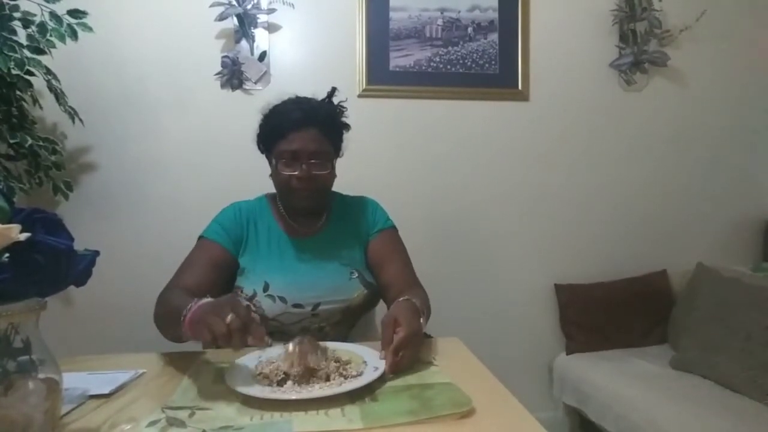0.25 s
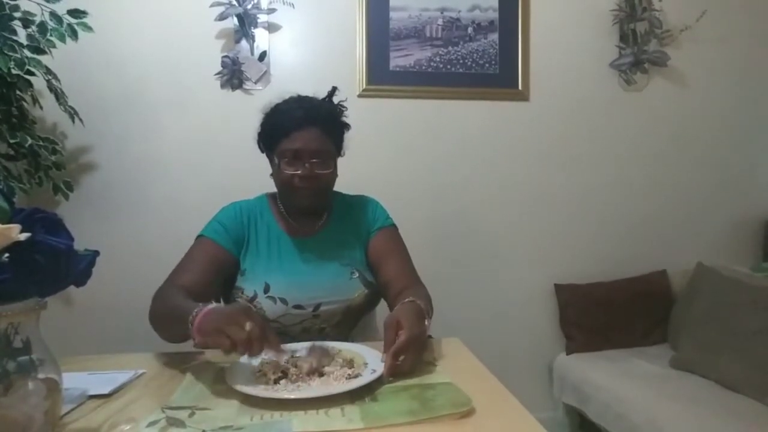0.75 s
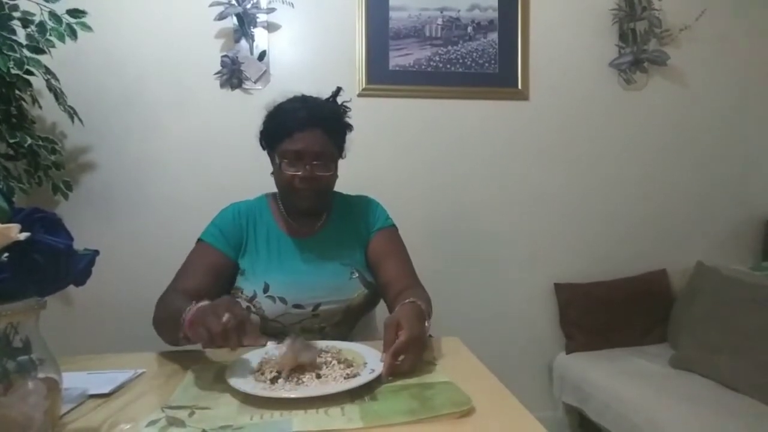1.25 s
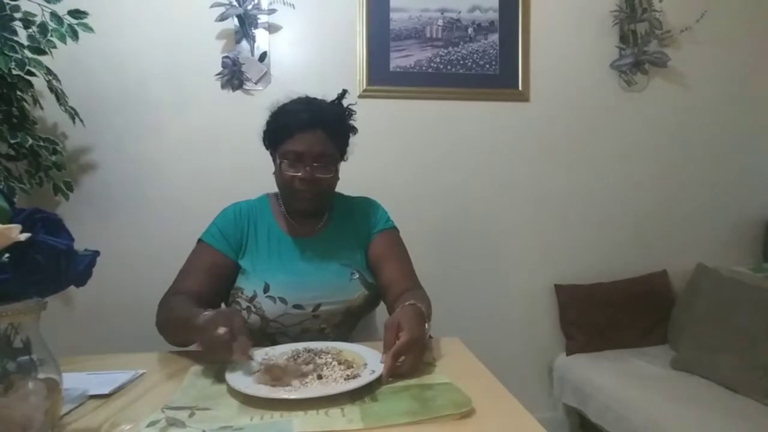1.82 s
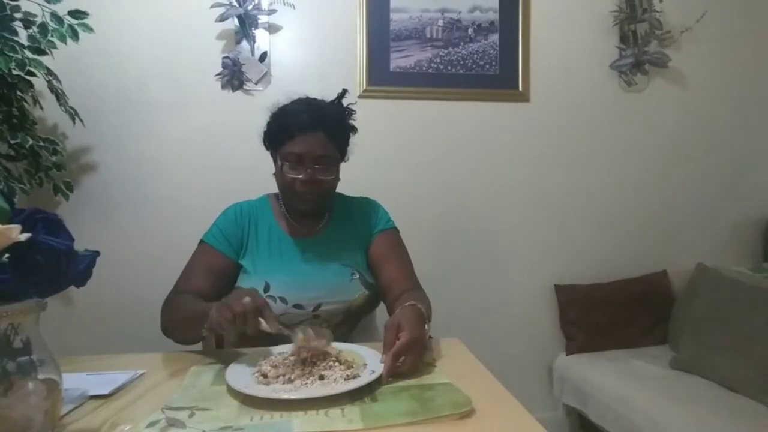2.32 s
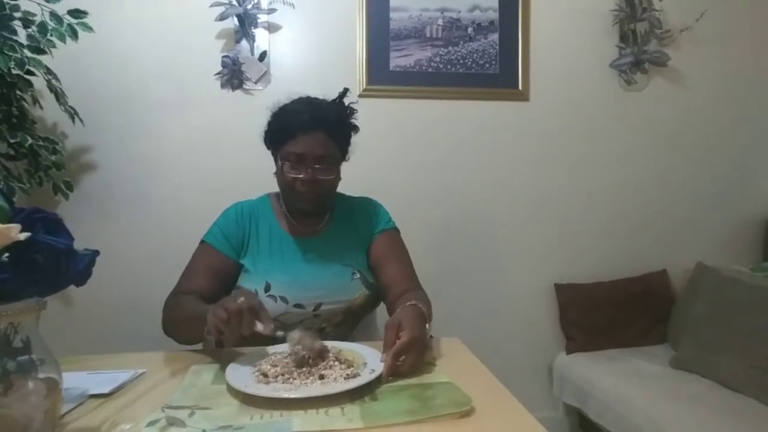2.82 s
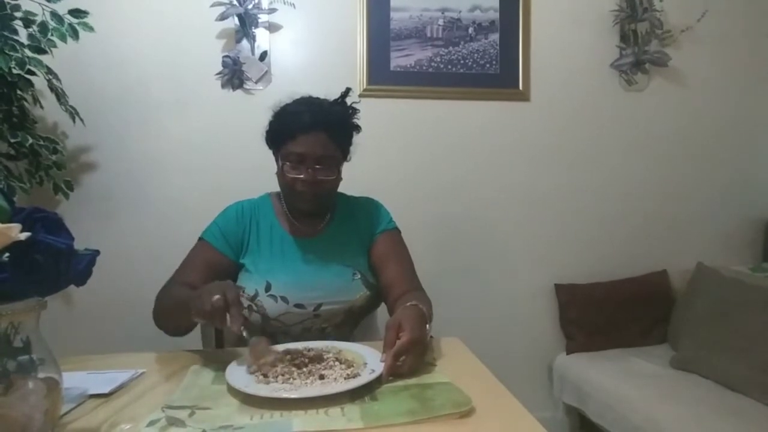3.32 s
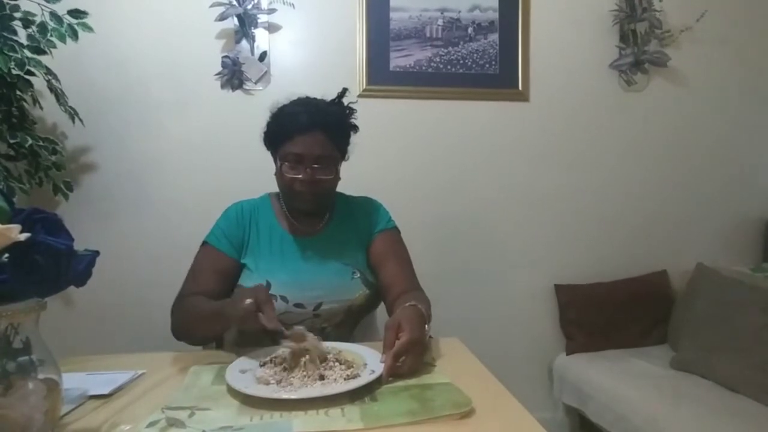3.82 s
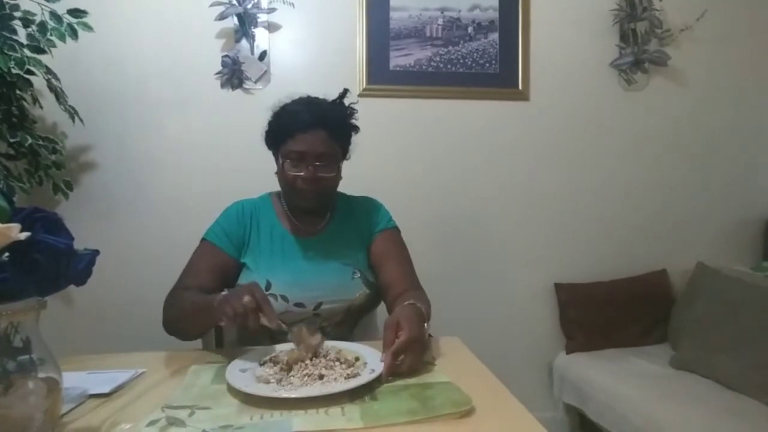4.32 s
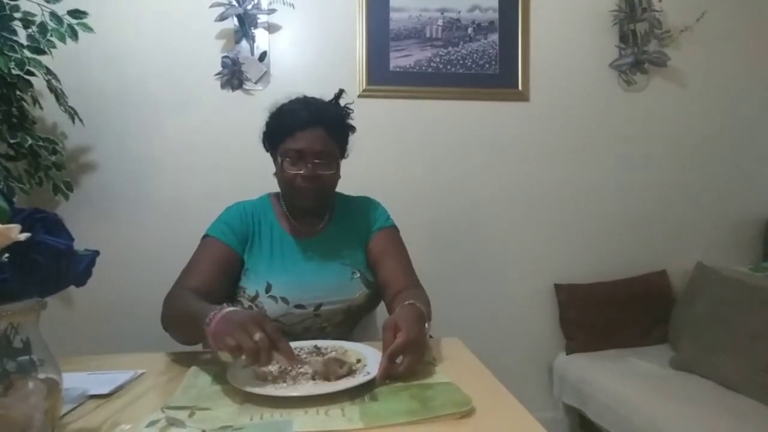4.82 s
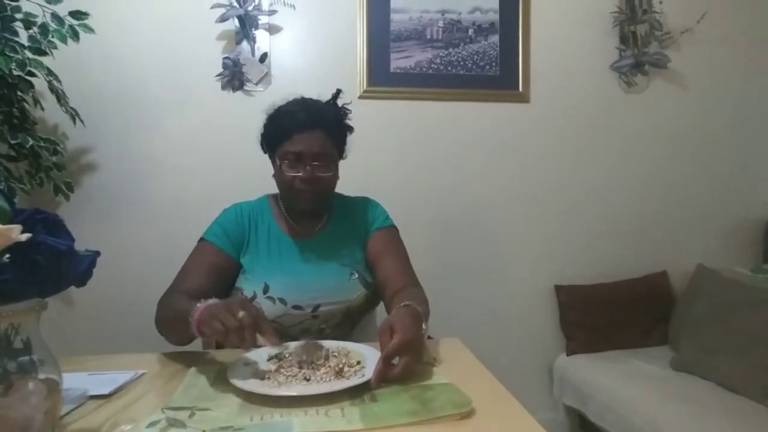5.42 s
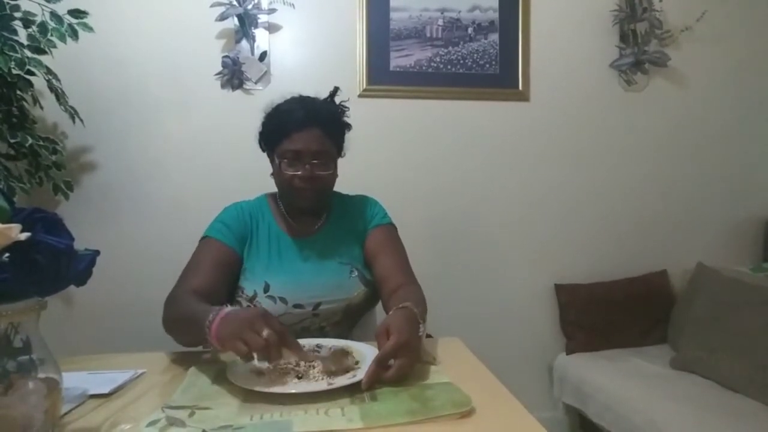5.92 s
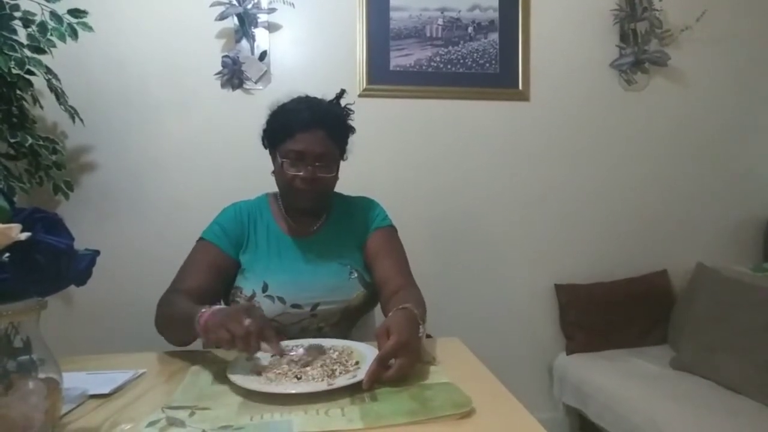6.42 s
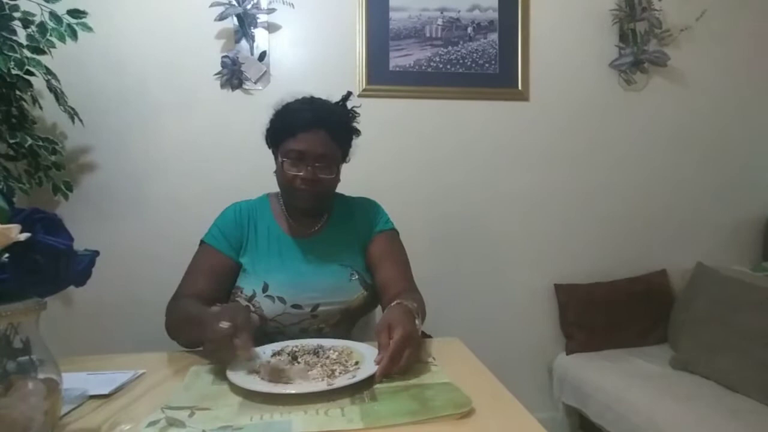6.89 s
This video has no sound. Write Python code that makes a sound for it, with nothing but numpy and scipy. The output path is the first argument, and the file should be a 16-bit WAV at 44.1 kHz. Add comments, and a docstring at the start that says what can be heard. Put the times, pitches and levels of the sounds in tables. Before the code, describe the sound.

A steel fork stirs thick, moist food on a ceramic plate. Small sharp ticks and short gritty scrapes come in irregular clusters, with brief high metallic singing. A few harder blows make the plate clink, the two loudest past the middle, with a dull table knock. Close, bright phone pickup in a small furnished room, over a soft hush and distant appliance hum.

```python
"""A steel fork stirs thick food on a ceramic plate in a small furnished room, two metres from a phone.
Noise-burst ticks of the tines on the glaze and drifting sines of singing steel lie over gritty drags.
Harder blows ring the modes of the plate by striking place, crack, and knock the table under it.
Wet food crackles as smeared noise snaps; far off an appliance hums as narrow noise bands over a hush.
Diffuse tails give the room; the microphone port peaks near 9 kHz."""
import sys
import numpy as np
from scipy import signal
from scipy.fft import rfft, irfft, next_fast_len
from scipy.io import wavfile
from scipy.ndimage import uniform_filter1d, minimum_filter1d

SR = 44100
rng = np.random.default_rng(int(sys.argv[2]) if len(sys.argv) > 2 else 0)


def transcribe(signal):
    """Save signal, clipped to [-1, 1], as a 16-bit WAV file at the path in sys.argv[1]."""
    frames = np.atleast_2d(signal).T
    limited = np.clip(frames, -1, 1)
    pcm = np.round(limited * 32767).astype(np.int16)
    wavfile.write(sys.argv[1], SR, pcm)


N = 315315  # samples


def amp(db):
    """Amplitude factor of a level in dB."""
    return 10 ** (np.asarray(db) / 20)


def unit(x):
    """Scale to an RMS of 1."""
    return x / np.sqrt(np.mean(x ** 2) + 1e-20)


def along(points, hz):
    """Interpolate (frequency [Hz], value) points on a log frequency axis."""
    f, value = np.transpose(points)
    return np.interp(np.log(hz + 1), np.log(f + 1), value)


def filtered(x, response):
    """Multiply the spectrum by a complex response of frequency."""
    m = next_fast_len(x.shape[-1] + 4096)
    spectrum = rfft(x, m) * response(np.fft.rfftfreq(m, 1 / SR))
    return irfft(spectrum, m)[..., :x.shape[-1]]


def coloured(x, points):
    """Shape the spectrum by (frequency [Hz], gain [dB]) points."""
    return filtered(x, lambda hz: amp(along(points, hz)))


def peak(hz, centre_hz, width_hz):
    """Response of one causal resonance with gain 1 at its centre."""
    return 1j * hz * width_hz / (centre_hz ** 2 - hz ** 2 + 1j * hz * width_hz)


def swell(t, rise):
    """Smooth onset from 0 towards 1 with time constant rise [s]."""
    return (1 - np.exp(-t / rise)) ** 2


def ring(modes, t, scatter_db, waver):
    """Damped sines at slightly new strengths; the touch of hand and food makes their phase wander."""
    hz, db, t60 = np.transpose(modes)[:, :, None]
    # random walk of the phase, waver in radians per root second
    drift = waver * np.cumsum(rng.standard_normal((len(modes), len(t))), axis=1) / np.sqrt(SR)
    level = db + scatter_db * rng.standard_normal(db.shape) - 60 * t / t60
    return np.sum(amp(level) * np.sin(2 * np.pi * hz * t + drift), axis=0)


def puff(t, t60, rise=0.00016):
    """A burst of noise that swells quickly and dies away."""
    return amp(-60 * t / t60) * swell(t, rise) * rng.standard_normal(len(t))


def add(track, s, sound):
    """Mix a sound into the track at time s [s]."""
    start = max(round(s * SR), 0)
    track[start:start + len(sound)] += sound


# spectrum shape of the hush in the room: (frequency [Hz], relative level [dB])
HUSH_COLOUR = [(15, -75), (25, -61.5), (80, -20), (117, -14.5), (185, 0.5), (217, -5.5), (293, 0),
               (317, -1.5), (363, -2.5), (754, -23.5), (1400, -16.5), (1520, -19.5), (6380, -51),
               (9070, -25.5), (16000, -80)]
# fuzzy hum lines of the far appliance: (frequency [Hz], width [Hz], level [dB])
HUM_LINES = [(189.7, 10.6, -63.5), (285.4, 17, -65.5), (366, 14, -64.5), (391.7, 12, -65.5), (467, 65, -69)]
HUSH_DB = -58.5


def room_tone():
    """Broad hush, with far-off hum lines that waver because each is noise through a narrow resonance."""
    tone = amp(HUSH_DB) * unit(coloured(rng.standard_normal(N), HUSH_COLOUR))
    noise = rng.standard_normal(N)
    for hz, width_hz, db in HUM_LINES:
        line = filtered(noise, lambda f: peak(f, hz, width_hz))
        tone += amp(db) * unit(line)
    return tone


# how long the small furnished room rings: (frequency [Hz], t60 [s])
ROOM_DECAY = [(200, 0.72), (1000, 0.36), (4000, 0.39), (9000, 0.35), (15000, 0.26)]


def room(x):
    """Two diffuse tails, each frequency dying at its own speed; every third of a second the paths differ."""
    out, step = np.zeros((2, N + 2 * SR)), SR // 3
    delay = 90  # samples, about 2 ms before the tail arrives
    for start in range(0, N, step):
        hz, t, bins = signal.stft(rng.standard_normal((2, SR // 2)), SR, nperseg=256)
        decay = amp(-60 * t / along(ROOM_DECAY, hz)[:, None])
        tail = signal.istft(bins * decay, SR, nperseg=256)[1]
        tail /= np.linalg.norm(tail[0])
        wet = signal.fftconvolve(x[None, start:start + step], tail, axes=1)
        out[:, start + delay:start + delay + wet.shape[1]] += wet
    return out[:, :N]


# resonance of the microphone port: (frequency [Hz], width [Hz], level over the direct sound [dB])
PORT = (8785, 1100, 10.4)


def microphone_port(x):
    """The port adds its own resonance to the sound that passes straight through."""
    centre_hz, width_hz, db = PORT
    return filtered(x, lambda hz: 1 + amp(db) * peak(hz, centre_hz, width_hz))


# crackle of the food along the strokes: (time [s], relative level [dB])
STIR = [(0.02, -57.5), (0.24, -64), (0.84, -61.5), (1.53, -68.5), (1.81, -62.5), (2.55, -61), (2.81, -61.5),
        (3.0, -68), (3.56, -60), (4.2, -64.5), (4.36, -71.5), (4.8, -58), (5.16, -66), (5.6, -58.5),
        (5.93, -58), (6.53, -63), (7.15, -65.5)]
# colour of the wet food: (frequency [Hz], gain [dB])
FOOD_COLOUR = [(1500, -23), (4000, -4), (7000, -11.5), (10000, -4), (16000, -6.5)]


def food():
    """Tiny sticky snaps of uneven size over a moist rustle, following the stroke."""
    s, db = np.transpose(STIR)
    struck = rng.random(N) < 300 / SR  # about 300 snaps a second
    snaps = struck * rng.standard_normal(N) * amp(3 * rng.exponential(size=N))
    smeared = signal.fftconvolve(snaps, puff(np.arange(300) / SR, 0.0089))[:N]
    rustle = unit(smeared) + rng.standard_normal(N)
    level = np.interp(np.arange(N) / SR, s, db) - 7.5
    return amp(level) * unit(coloured(rustle, FOOD_COLOUR))


# the fork dragged over the plate: (time [s], length [s], level at the height of the stroke [dB])
DRAGS = [(0.027, 0.33, -66), (0.548, 0.18, -67), (1.059, 0.11, -61), (2.438, 0.31, -64),
         (2.728, 0.28, -68.5), (2.963, 0.21, -67.5), (3.495, 0.17, -65), (4.12, 0.17, -67.5),
         (5.08, 0.1, -71), (5.364, 0.21, -65), (6.385, 0.33, -62.5), (6.738, 0.15, -68)]
# colour of the scrape: (frequency [Hz], gain [dB])
DRAG_COLOUR = [(400, -27), (1000, 5), (2500, -6.5), (5000, -3.5), (7000, -19.5), (10000, -32.5)]


def drag():
    """Gritty friction noise that bites fast and eases off through each stroke."""
    stroke = np.zeros(N + SR)
    for s, length, db in DRAGS:
        u = np.linspace(0, 1, round(length * SR))
        add(stroke, s, amp(db) * np.sin(np.pi * u ** 0.44) ** 2.7)
    unevenness_db = 3 * unit(uniform_filter1d(rng.standard_normal(N), 200))
    grit = amp(unevenness_db) * rng.standard_normal(N)
    return stroke[:N] * unit(coloured(grit, DRAG_COLOUR))


# touches that set the tines singing:
# (time [s], level of tine mode 1 [dB], of mode 2 [dB], of mode 3 [dB], time until the food chokes them [ms])
SINGS = [(.077, -28.5, -60, -29, 6.9), (.087, -60, -36, -33, 13), (1.068, -48, -50, -45, 8),
         (2.499, -37, -53, -30, 31), (2.594, -70, -48, -55, 6), (2.755, -68, -70, -46, 8),
         (2.769, -66, -70, -48, 15), (2.867, -64, -70, -48, 8), (3.096, -62, -70, -45, 6),
         (5.437, -41.5, -46, -28, 3.4), (6.462, -45, -29, -26, 37)]
# modes of the steel tines: (frequency [Hz], t60 [s])
TINE_MODES = [(7090, .12), (14220, .1), (15130, .15)]


def tines():
    """The steel modes sing freely for a moment, until the food damps them."""
    steel, t = np.zeros(N + SR), np.arange(SR // 4) / SR
    for s, *levels, free_ms in SINGS:
        modes = [(hz, db, t60) for (hz, t60), db in zip(TINE_MODES, levels)]
        song = ring(modes, t, scatter_db=0, waver=32)
        choke = amp(-60 * np.maximum(t - free_ms / 1000, 0) / 0.022)
        add(steel, s, choke * (1 - np.exp(-t / 0.0015)) * song)
    return steel[:N]


# blows on the plate: (time [s], ring level [dB], place [0 edge, 1 rim, 2 shoulder, 3 well],
# relative crack level over the ring [dB], knock level through the table [dB], knock frequency [Hz])
BLOWS = [(0.463, -58, .1, 3, -46.5, 126), (1.088, -68, 2.9, 2, -44, 796),
         (1.833, -30.5, 2.87, 4, -40.5, 142), (3.514, -54, 2.65, 3, -48.5, 138),
         (4.641, -17, 1.02, -1.5, -39, 143), (4.653, -27.5, 1.4, -12.5, -40.5, 296),
         (5.43, -59.5, 2.8, 11.5, -40, 834), (5.737, -13.5, 1.98, -3, -34, 172.3),
         (6.791, -45, 0.018, -2.5, -37, 473), (6.897, -43, 2.8, 5, -36, 540)]
# modes of the plate by striking place: (frequency [Hz], level at the edge [dB], at the rim [dB],
# at the shoulder [dB], in the well [dB], relative t60 [s])
PLATE_MODES = [(622, -16, -26.5, -15.5, -14.5, 0.11), (1217, -5, -7.5, -13, -5, .11),
               (1639, -11, -6.5, -10, -17.5, 0.062), (1929, -14, -7.5, -7.5, -5, 0.094),
               (2220, -34, -17.5, -19, -15, 0.04), (2693, -14, -8, -2.5, -14.5, 0.12),
               (3004, -29, -24, -1, -14.5, 0.024), (3475, -22, -9.5, -11.5, -2, 0.06),
               (3493, -6, -5, 0, -7.5, 0.13), (3548, -4.5, -7.5, -6.5, -8.5, 0.12),
               (3705, -20, -10.5, -8.5, 2.5, .09), (3750, -28, -12.5, -15.5, 0, .06),
               (4030, -26, -17, -14.5, -17, .055), (4350, -5, -10.5, -7, -19.5, 0.12),
               (4450, -12, -16, -23.5, -28, .07), (4580, -28, -23, -21.5, -34, 0.036),
               (5350, -27, -20.5, -14.5, -15, 0.05), (5306, -17, -10, -13.5, -35, 0.1),
               (5800, -28, -36, -22.5, 2, 0.087), (6200, -25, -13, -17.5, -33, 0.1),
               (7490, -24, -14.5, -25.5, -11, 0.09), (7580, -18, -23.5, -25.5, -23, 0.13),
               (8150, -24, -28.5, -26.5, -4, .085), (8750, -34, -20.5, -14.5, -20.5, .075),
               (8710, -15, -15, -6.5, -17.5, 0.099), (8870, -26, -5, -20, -6.5, 0.1),
               (10000, -8, -21.5, -16, -34.5, .1), (11770, -27, -26, -23, -29, .09),
               (10800, -27, -27.5, -25.5, -36, 0.15), (13120, -24, -28, -39, -22, .065)]
# colour of the crack of a blow: (frequency [Hz], gain [dB])
CRACK_COLOUR = [(100, -68.5), (300, -6), (800, 1.5), (2000, 1.5), (5000, -2.5), (10000, -21.5),
                (16000, -13)]
FREE_OUTSIDE, FREE_IN_WELL = 1.03, 0.72  # factors on the ring time; the food lies in the well
RISE_MS, RISE_MS_PER_DB = 0.4, 0.0281  # onset time constant of a 0 dB blow, slower per dB below


def plate():
    """Where the fork lands decides which modes speak, food damps them; the table under the plate knocks."""
    china, crack, table = np.zeros((3, N + SR))
    t = np.arange(SR // 3) / SR
    for s, db, place, crack_db, knock_db, knock_hz in BLOWS:
        free = np.interp(place, range(4), [FREE_OUTSIDE] * 3 + [FREE_IN_WELL])
        modes = [(hz, np.interp(place, range(4), levels), free * t60) for hz, *levels, t60 in PLATE_MODES]
        rise = max(RISE_MS - RISE_MS_PER_DB * db, 0.1) / 1000
        sound = ring(modes, t, scatter_db=1, waver=13)
        add(china, s, amp(db) * sound * swell(t, rise))
        burst = puff(t, 0.025, rise / 2) + 0.35 * puff(t, 0.12, rise)
        add(crack, s, amp(db + crack_db + 8.5) * burst)
        cycles = knock_hz * t  # wood rings for about twenty cycles
        add(table, s, amp(knock_db - 3 * cycles) * np.sin(2 * np.pi * cycles) * (1 - np.exp(-cycles)))
    # a second-order high-pass thins the ring of the plate below about 400 Hz
    thinned = filtered(china, lambda hz: (1j * hz / (400 + 1j * hz)) ** 2)
    return thinned[:N], coloured(crack, CRACK_COLOUR)[:N], table[:N]


# clear touches of the tines on the glaze:
# (time [s], relative tick level [dB], relative level of the duller part over it [dB])
TICKS = [(0.0149, -31, -0.5), (0.0328, -27, 0), (0.052, -32, -17), (0.0767, -20.5, -23), (0.0904, -29.5, 7),
         (0.1531, -40, 10.5), (0.3975, -50, 1), (0.4628, -51, 10), (0.5701, -44.5, 6), (0.5977, -48, 9),
         (0.9043, -47, 12.5), (0.9398, -45, -3), (0.9777, -49, 13), (1.043, -40, 4.5), (1.0675, -18, -8),
         (1.2131, -43.5, 4), (1.253, -49, 5), (1.5364, -42.5, -3), (1.8317, -29, 17.5), (1.926, -35, -17),
         (2.0078, -39, -26.5), (2.1949, -39, -1.5), (2.2922, -42, -5), (2.3146, -42, 1),
         (2.4578, -24, -3.5), (2.487, -27, -8), (2.4977, -18, -11), (2.575, -40, 7), (2.5935, -27, -2),
         (2.6429, -44, -9), (2.7551, -38.5, 3), (2.7686, -30.5, -5), (2.8215, -39, 11), (2.8664, -38, -2),
         (2.9856, -33, 4), (2.9957, -42, 7), (3.031, -37, -9), (3.0959, -39, 3), (3.1338, -41, -1),
         (3.2605, -46, 0), (3.4989, -44, -4), (3.5129, -38, 0), (3.5468, -44, 10.5), (3.6641, -44, -15),
         (4.149, -41.5, 7), (4.1809, -43, -17), (4.1934, -36.5, -4), (4.2418, -39, 0), (4.3076, -38.5, 1),
         (4.6374, -26.5, 10), (4.6423, -28.5, 25.5), (4.7694, -44, 17), (4.7804, -41, 16),
         (4.8189, -45, 22), (5.0953, -46, -1.5), (5.1093, -41.5, -8), (5.1208, -36.5, -9), (5.130, -40, -8),
         (5.2659, -42, -14), (5.2969, -44.5, 5), (5.3694, -41.5, -7), (5.3764, -32.5, 2), (5.3832, -26, -3),
         (5.4264, -42.5, 2), (5.4375, -27, -4), (5.4464, -38, -7), (5.5099, -37.5, 4.5), (5.7359, -19, 21),
         (5.8886, -51.5, 28), (6.0887, -46.5, 7), (6.1754, -45, -1), (6.2096, -48, 5), (6.3874, -49, 8),
         (6.409, -31, -18.5), (6.4168, -17.5, -18), (6.4456, -38, 8), (6.4607, -19.5, -5),
         (6.534, -26.5, -16), (6.542, -27, 0), (6.5764, -46.5, 4), (6.5974, -44, 6), (6.7461, -32.5, -4),
         (6.8274, -40, 1), (6.8758, -45, 13), (6.8962, -35.5, 13.5), (6.953, -45, 9), (6.9711, -39.5, -2),
         (7.0848, -39.5, -14)]
# colour of the bright tick: (frequency [Hz], gain [dB])
TICK_COLOUR = [(2000, -24.5), (4500, -29), (6500, -20.5), (7300, -6.5), (10000, -5), (13000, -1.5),
               (16000, -1)]
TICK_MS, TICK_MS_PER_DB = 18.6, 0.3141  # t60 of a touch listed at 0 dB, shorter per dB below
# faint chance touches in between: rate, mean and spread of their relative level
GRAZES_PER_S, GRAZE_DB, GRAZE_SPREAD_DB = 2.7, -53, 3.5


def ticks():
    """Each touch is a sharp bright tick and a duller, slightly longer one from the glaze."""
    bright, dull, t = np.zeros(N + SR), np.zeros(N + SR), np.arange(SR // 10) / SR
    times = np.cumsum(rng.exponential(size=60)) / GRAZES_PER_S
    chance = GRAZE_SPREAD_DB * rng.standard_normal((len(times), 2))
    grazes = [(s, GRAZE_DB + a, b) for s, (a, b) in zip(times, chance) if s < N / SR]
    for s, db, dull_db in TICKS + grazes:
        length = max(TICK_MS + TICK_MS_PER_DB * db, 1) / 1000
        body = amp(db + 6.5) * puff(t, length, length / 12)
        click = amp(db + 10.5) * puff(t, 0.0012)
        add(bright, s, body + click)
        add(dull, s, amp(db + dull_db + 1.5) * puff(t, 1.53 * length, length / 12))
    glaze = filtered(dull, lambda hz: peak(hz, 8710, 1400))
    return (coloured(bright, TICK_COLOUR) + glaze)[:N]


def scene():
    """Fork, plate and food with their room through two close ports, plus table thump and room tone."""
    china, crack, thump = plate()
    touch = ticks()
    contact = crack + touch
    near = china + contact + tines() + food() + drag()
    # ticks beam forward, so the walls get less of them
    shared, unshared = room(near - 0.058 * touch)
    mid = near + amp(-3.5) * shared
    # the two close ports hear the same bass; sharp treble reaches them slightly apart
    quadrature = signal.hilbert(contact, next_fast_len(N))[:N].imag  # phase turned by 90 degrees
    apart = amp(-35.5) * unshared + amp(-21.5) * quadrature
    # the difference fades below 3500 Hz
    side = filtered(apart, lambda hz: 1 / (1 + (3500 / (hz + 1)) ** 8))
    return microphone_port(np.array([mid + side, mid - side])) + thump + room_tone()


TOP_HZ = 15880


def band_limit(x):
    """Steep cut of everything above the top frequency."""
    return filtered(x, lambda hz: 1 / (1 + (hz / TOP_HZ) ** 300))


def record(dry):
    """The band limit; a quick limiter turns both channels down where a peak would pass 0.9."""
    heard = band_limit(dry)
    needed = np.minimum(1, 0.9 / (np.abs(heard).max(axis=0) + 1e-9))
    # hold the lowest gain for about 6 ms and smooth it over 3 ms
    gain = uniform_filter1d(minimum_filter1d(needed, size=257), size=129)
    return band_limit(heard * gain)


dry = scene()
out = record(dry)
transcribe(out)
```